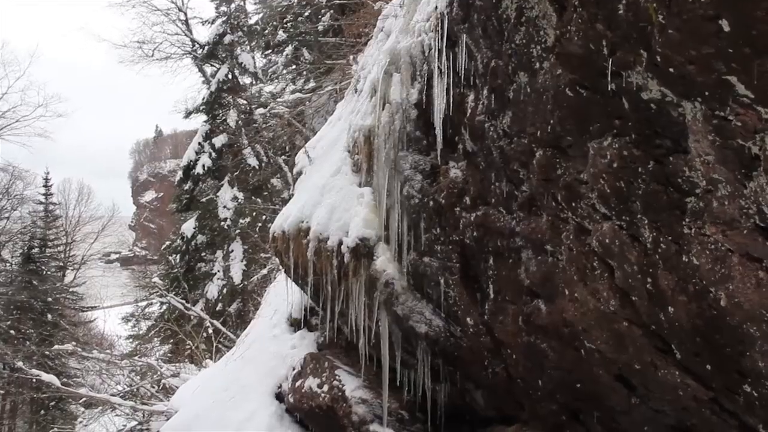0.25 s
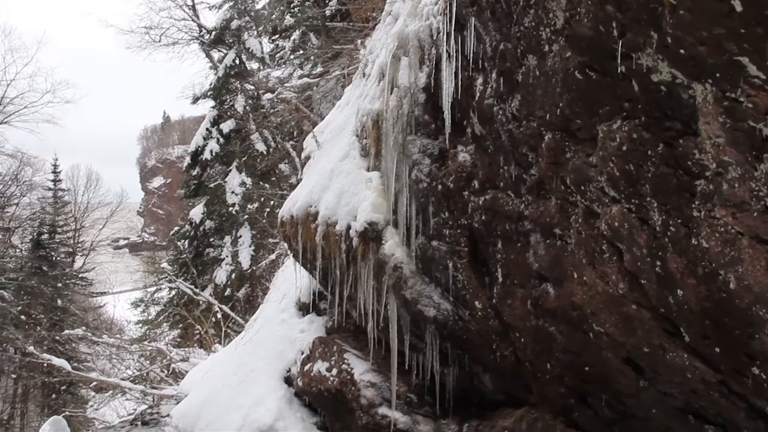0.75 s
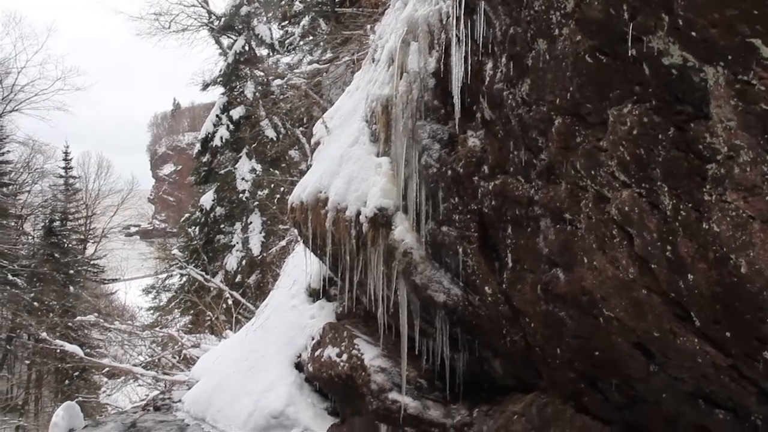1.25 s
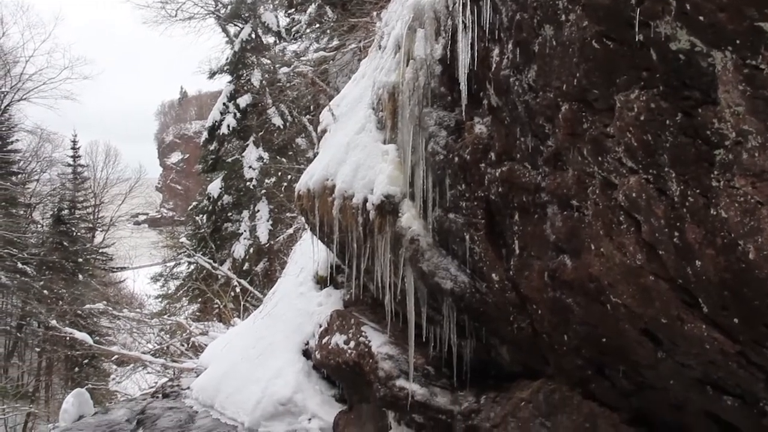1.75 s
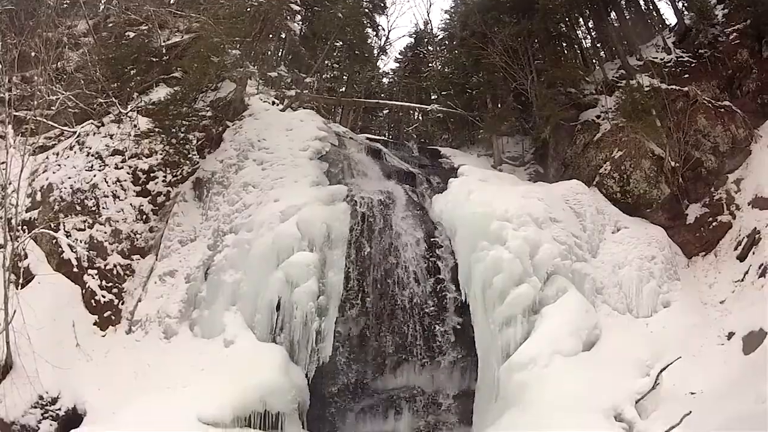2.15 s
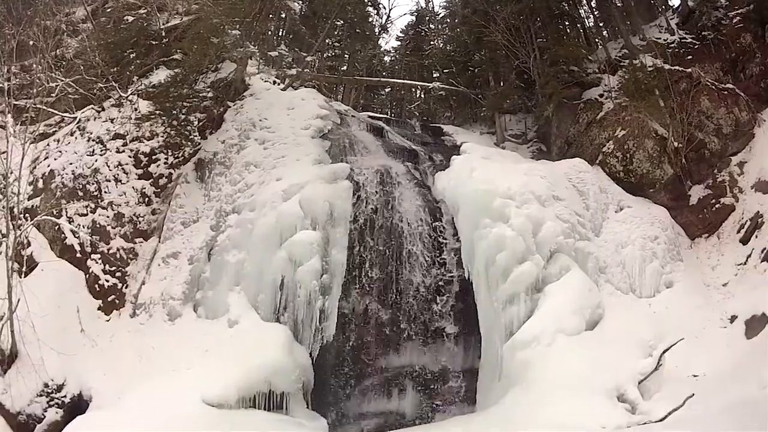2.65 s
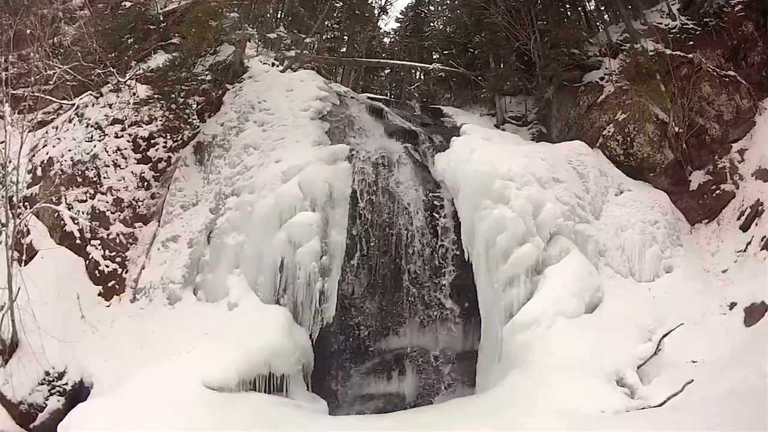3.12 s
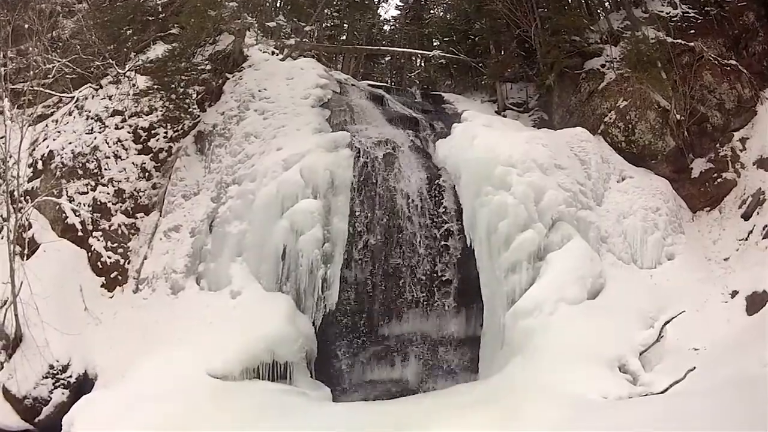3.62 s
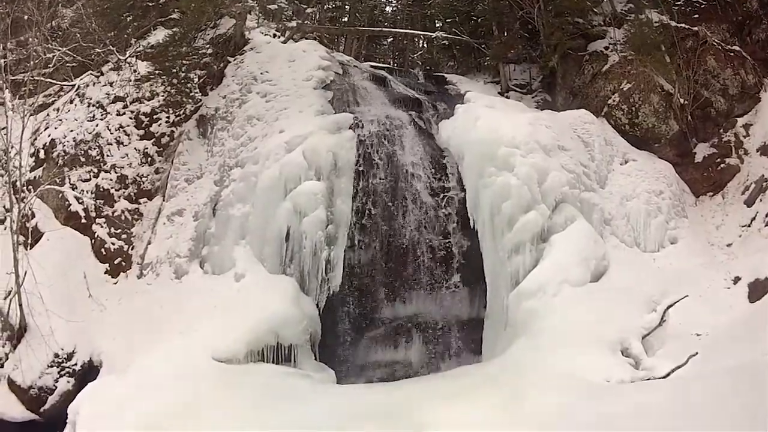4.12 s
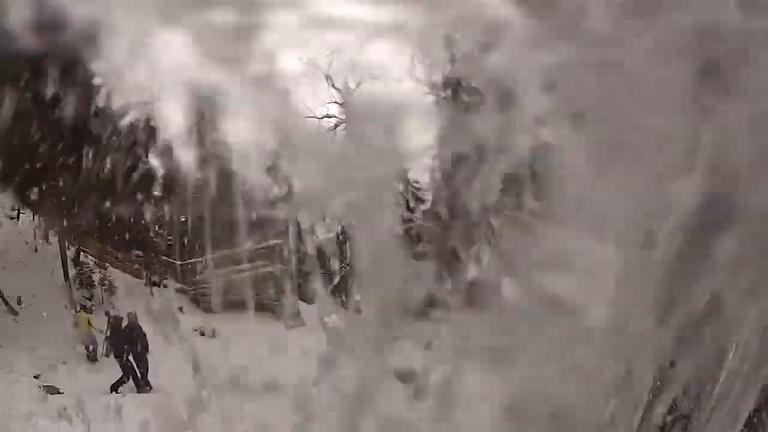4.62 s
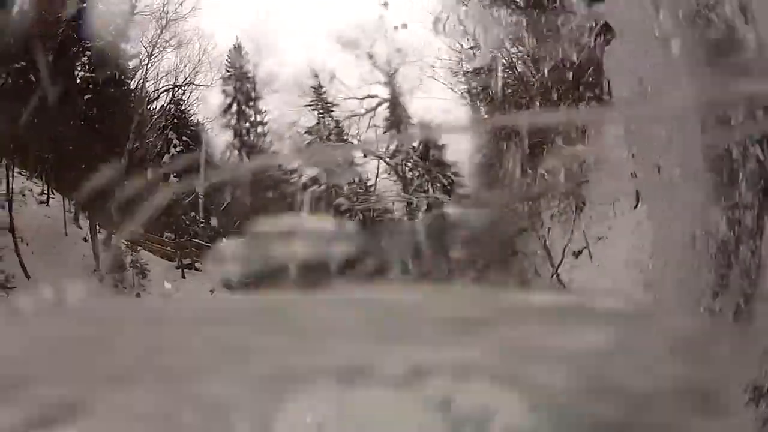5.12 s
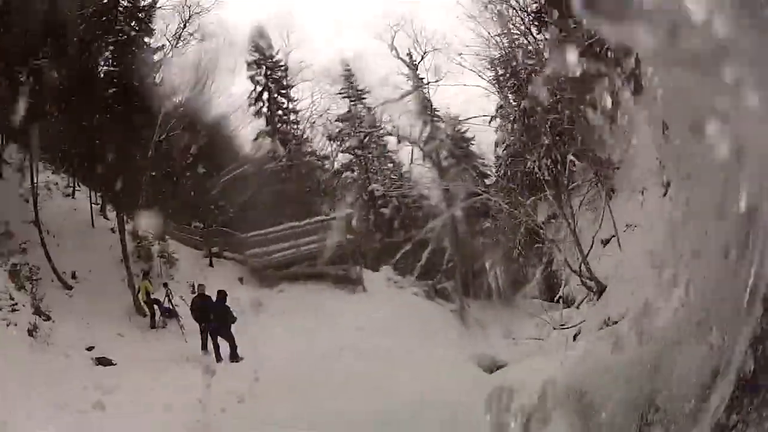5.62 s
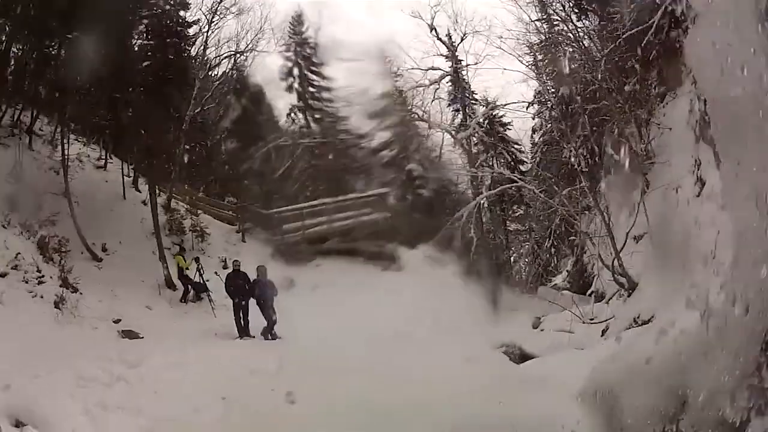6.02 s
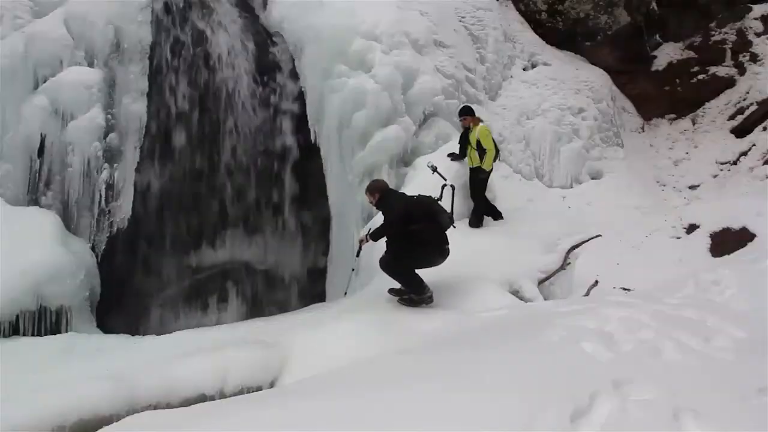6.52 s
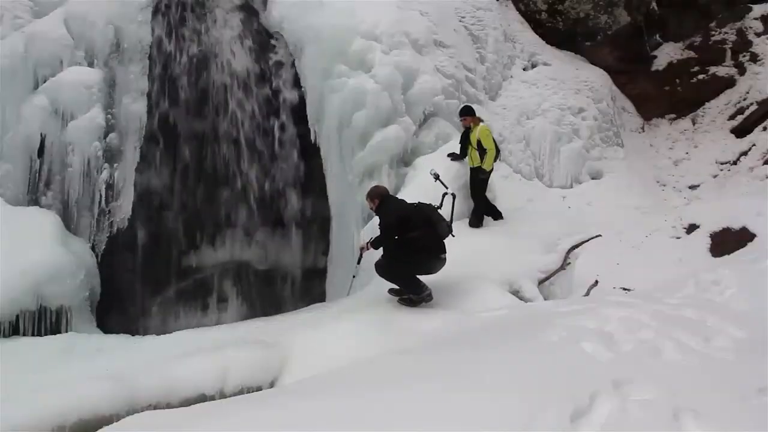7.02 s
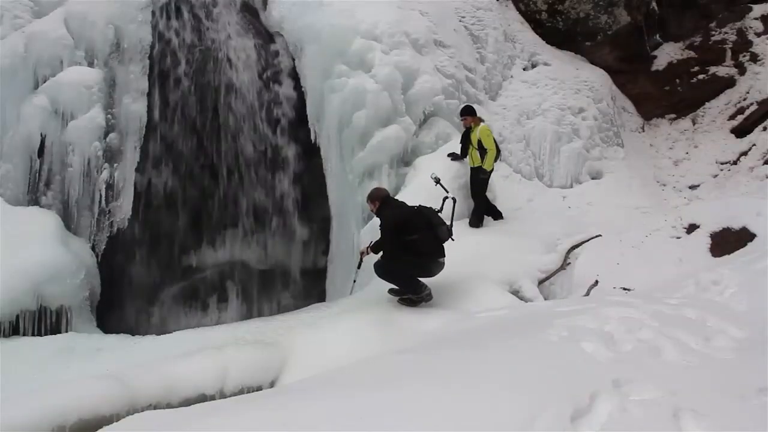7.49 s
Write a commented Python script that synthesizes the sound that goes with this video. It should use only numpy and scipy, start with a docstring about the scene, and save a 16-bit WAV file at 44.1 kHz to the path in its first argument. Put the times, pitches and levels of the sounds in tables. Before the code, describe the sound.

Half-frozen waterfall: rumbling roar under rock, near silence in a sealed case, violent distorted drop hits with hollow thumps, finally loud steady rushing water.

```python
"""A half-frozen waterfall from four places

The fall roars under a rock overhang, is muffled in a sealed camera housing, then heard in the spray, where
drops slap the housing and overdrive its microphone, and lastly in the open as a bright rush.
Falling water is filtered noise with random impacts; drops are brief shaken bursts that excite
decaying wall modes and an air hum. The sound is mono and changes abruptly on leaving the overhang
and on entering the open."""
import sys
import numpy as np
from scipy import signal
from scipy.fft import rfft, irfft, next_fast_len
from scipy.io import wavfile
from scipy.ndimage import uniform_filter1d, map_coordinates

SR = 44100
rng = np.random.default_rng(int(sys.argv[2]) if len(sys.argv) > 2 else 0)


def to_wav(s):
    """Save 16-bit WAV."""
    ch = np.atleast_2d(s).T  # columns
    pcm = np.round(np.clip(ch, -1, 1) * 32767)  # PCM
    wavfile.write(sys.argv[1], SR, pcm.astype(np.int16))


N = 341772

LEAVE_OVERHANG_S, ENTER_OPEN_S = 1.9975, 6.2345  # changes of place
ENTER_SPRAY_S, WETTING_S = 4.42, 0.28  # the camera enters the spray; time until water covers it
TOP_HZ = 15900  # band limit of the camera

# Roar under the overhang, spectral density: (frequency [Hz], level [dB per Hz])
ROAR_SPECTRUM = [(25, -29), (50, -24), (85, 0), (130, -13.5), (180, -2), (270, 2.5), (400, -6), (520, -4),
                 (680, -3), (1100, -4.5), (3400, -13), (7000, -19), (11800, -22), (15800, -33.5)]
# Water spattering on stone, spectral density: (frequency [Hz], level [dB per Hz])
SPATTER_SPECTRUM = [(200, -32), (2000, -11), (5000, -2), (9000, 3), (12000, -3.5), (15800, -15)]
# Broad spectrum of the fall heard inside the housing: (frequency [Hz], level [dB per Hz])
SEALED_SPECTRUM = [(25, -1), (60, -1.5), (130, -9), (290, -7.5), (600, -15.5), (1000, -14), (1200, -9),
                   (1550, -12), (1900, -7), (2200, 1), (2550, -3), (2850, -20), (3050, -30), (3600, -60)]
# Wall resonances that let the hiss in: (centre [Hz], width [Hz], level [dB])
WALL_RESONANCES = [(3300, 360, 1.5), (3840, 400, -17.5), (4770, 930, -6), (7190, 1040, -10),
                   (8660, 390, -6.5), (9740, 500, -12), (14200, 500, -15), (15150, 250, -11)]
# Hollow swell as the water closes in, before its final fade: (time [s], level [dB])
SWELL_LEVEL = [(4.05, -68), (4.264, -53.5), (4.318, -38), (4.386, -39.5), (4.4, -38.5)]
# Spectral density of that swell: (frequency [Hz], level [dB per Hz])
SWELL_SPECTRUM = [(8, -30), (25, -7), (65, 5.5), (150, -9), (300, -14), (450, -33), (800, -22), (1000, -15),
                  (1250, -5.5), (1500, -23), (2300, -16), (3500, -42), (12000, -35)]
# Fine spray on the housing, before the wall colours it: (frequency [Hz], level [dB per Hz])
SPRAY_SPECTRUM = [(8, -20), (25, 5), (90, -9), (300, -10), (430, -13), (650, -5.5), (900, -4), (1150, -4),
                  (1550, -6), (2200, -3), (3500, -12.5), (6000, -22), (10000, -25), (15500, -26)]
# Drops that slap the housing, levels relative before overdrive:
# (time [s], level [dB], length [s], mean pitch [Hz], level of the air hum [dB])
DROPS = [(4.422, -28, 0.009, 1126, -57), (4.468, -21.5, .0027, 2020, -54), (4.491, -16, .0015, 2050, -48),
         (4.501, -9.5, 0.0013, 1810, -44), (4.5161, -4, .0012, 1340, -35), (4.5215, 0, 0.0051, 1195, -32),
         (4.5947, -20, 0.0035, 970, -22), (4.6025, -5.5, 0.0042, 897, -38), (4.619, -27, 0.0073, 900, -50),
         (4.6596, -9, 0.0045, 1576, -44), (4.676, -13.5, .004, 1200, -20), (4.685, -20.5, .007, 890, -30),
         (4.7026, -31, 0.0069, 905, -25), (4.7495, -4, .0037, 925, -18.5), (4.763, -21.5, .0025, 2070, -51),
         (4.833, -25, 0.0023, 1370, -58), (4.8492, -26.5, 0.0043, 950, -43),
         (4.871, -32.5, 0.007, 814, -29), (4.9314, -5.5, 0.0021, 1430, -34), (4.956, -16, 0.0095, 718, -40),
         (4.979, -20.5, .0045, 980, -18.5), (5.0255, -8, .0014, 980, -30), (5.058, -5, 0.0014, 1430, -24),
         (5.1043, -13, .007, 1100, -30), (5.1186, -8, 0.0028, 950, -40), (5.159, -8, 0.0049, 875, -27),
         (5.1873, -6, 0.0049, 1180, -15.5), (5.197, -19, 0.0055, 980, -46), (5.2089, -2, 0.0036, 1596, -34),
         (5.245, -22.5, .004, 1820, -38), (5.289, -20, 0.0064, 1490, -19), (5.2957, -20, 0.0073, 1010, -28),
         (5.3048, -18, 0.01, 860, -21), (5.3116, -11, 0.0043, 1297, -37), (5.4268, -31.5, .008, 1260, -48),
         (5.448, -13.5, 0.0019, 1300, -44), (5.4737, -7.5, .002, 920, -39),
         (5.5073, -16, 0.0049, 630, -23.5), (5.526, -21, .0025, 1500, -51),
         (5.5526, -15.5, 0.0029, 1790, -33), (5.5688, -6.5, 0.0015, 1120, -27),
         (5.61, -9.5, 0.0012, 1950, -35), (5.6358, -16, .002, 1410, -21), (5.647, -3, 0.0068, 1326, -26),
         (5.6883, -10.5, 0.0021, 1500, -20), (5.6948, -12.5, 0.0032, 1430, -35),
         (5.705, -28, 0.0043, 710, -15), (5.7546, -4.5, .0044, 2064, -30),
         (5.8189, -9.5, 0.0022, 1420, -24.5), (5.8658, -17, 0.0015, 930, -39),
         (5.8735, -17, .0016, 900, -47), (5.886, -14, 0.0056, 1570, -12.5), (5.8964, -12, .005, 914, -34),
         (5.9066, -15, .007, 925, -15), (5.9158, -14.5, 0.0076, 624, -45), (5.95, -10.5, 0.0018, 816, -44),
         (5.955, -13, .002, 820, -44), (5.9785, -26, 0.006, 895, -25), (5.991, -3, 0.0035, 860, -17),
         (6.0486, -26.5, 0.0041, 900, -53), (6.106, -34.5, 0.0062, 910, -40),
         (6.1477, -21.5, 0.007, 1990, -27.5), (6.1548, -22, 0.011, 796, -20.5),
         (6.2198, -4, 0.005, 1514, -45), (6.2296, 0.5, .0043, 863, -32)]
# Modes with which the housing wall rings: (nominal frequency [Hz], relative level [dB], t60 [s])
HOUSING_MODES = [(590, -10, .04), (840, -5, .07), (945, -1, .1), (7130, -25, .05), (8900, -26, .05)]
# Transmission of the housing wall, with deep notches: (frequency [Hz], gain [dB])
WALL_GAIN = [(200, 5), (430, -4.5), (600, 1.5), (860, 2), (1200, -4), (1500, -0.5), (3400, -1.5),
             (3850, -9), (4120, -13.5), (4550, 5.5), (7200, 8), (7700, -15), (8400, -10), (8850, 7.5),
             (11300, 8), (12000, -11), (12600, 7.5), (15200, 6), (15600, -15)]
# Whole gushes of water that dent the housing: (time [s], relative level [dB])
GUSHES = [(4.429, -17), (4.5174, 12), (5.2087, -11.5), (6.2297, 0)]
# Rush in the open, spectral density: (frequency [Hz], level [dB per Hz])
RUSH_SPECTRUM = [(30, -32), (80, -25.5), (150, -10), (300, -6.5), (600, -3.5), (1300, -2), (2500, -1.5),
                 (4200, 0), (7000, -1), (9700, -1), (12500, -6), (15700, -12)]


def amp(db):
    """Logarithmic level: 20 dB is a factor of ten in amplitude."""
    return 10 ** (np.asarray(db) / 20)


def unit(x):
    """Normalization: scale a signal to rms 1."""
    return x / np.sqrt(np.mean(x ** 2) + 1e-20)


def shape(points, hz):
    """Spectral envelope: interpolate (frequency [Hz], level [dB]) points over log frequency."""
    f, db = np.transpose(points)
    return amp(np.interp(np.log(hz + 1), np.log(f + 1), db))


def level(rows):
    """Amplitude envelope: interpolate (time [s], level [dB]) rows to a gain per sample."""
    return amp(np.interp(np.arange(N) / SR, *np.transpose(rows)))


def wobble(rate):
    """Slow random modulation: a smooth curve through `rate` random knots per second."""
    knots = rng.standard_normal(int(N * rate / SR) + 4)
    return map_coordinates(knots, [np.arange(N) * rate / SR])


def coloured(x, gain):
    """Minimum-phase filtering: the folded cepstrum gives a causal filter with the given gain."""
    m = 2 * next_fast_len(N // 2 + SR // 4)
    log_gain = np.log(np.maximum(gain(np.fft.rfftfreq(m, 1 / SR)), 1e-6))
    cepstrum = irfft(log_gain)
    cepstrum[1:m // 2] *= 2
    cepstrum[m // 2 + 1:] = 0
    response = np.exp(rfft(cepstrum))
    return irfft(rfft(x, m) * response)[:N]


def patter(rate, spread_db):
    """Shot noise: random tiny impacts of unequal size, about `rate` per second, rms 1."""
    chance, size = rng.random(N), rng.standard_normal(N)
    sign = np.sign(rng.standard_normal(N))
    impacts = (chance < rate / SR) * sign * amp(spread_db * np.clip(size, -2, 2))
    return unit(impacts)


def water(patchy_db, rate, splash_db):
    """Superposition: countless bubbles add up to noise in shifting patches, with nearer splashes on top."""
    spectrogram = signal.stft(rng.standard_normal(N), nperseg=512)[2]
    field = uniform_filter1d(rng.standard_normal(spectrogram.shape), size=5, axis=0)  # over frequency
    field = uniform_filter1d(field, size=8, axis=1)  # over time
    churn = signal.istft(spectrogram * amp(patchy_db * unit(field)), nperseg=512)[1][:N]
    splashes = patter(rate, spread_db=4.5)
    return unit(unit(churn) + amp(splash_db) * splashes)


def overhang(roar_db=-18.2, spatter_db=-35):
    """Reflection: the rock roof gathers the low roar; nearby, water spatters on stone in quick flurries."""
    flow = water(patchy_db=1.45, rate=980, splash_db=-8.0) * amp(0.24 * wobble(30.56))
    roar = unit(coloured(flow, lambda hz: shape(ROAR_SPECTRUM, hz)))
    flurries = patter(rate=1400, spread_db=6.5) * amp(2.5 * wobble(44.8))
    spatter = unit(coloured(flurries, lambda hz: shape(SPATTER_SPECTRUM, hz)))
    return amp(roar_db) * roar + amp(spatter_db) * spatter


def sealed_gain(hz):
    """Resonant transmission: wall resonances add to the broad gain of the sealed housing."""
    gain = shape(SEALED_SPECTRUM, hz)
    for centre, width, db in WALL_RESONANCES:
        gain = gain + amp(db) / (1 + ((hz - centre) / width) ** 2) ** 2
    return gain


def sealed_fall(hiss_db=-49, covered_db=-63, swell_fade_db_per_s=300):
    """Transmission: resonances pass the hiss, which swells hollowly, then dims as water covers the wall."""
    flow = water(patchy_db=1.5, rate=1500, splash_db=-18)
    cover = level([(ENTER_SPRAY_S, hiss_db), (ENTER_SPRAY_S + WETTING_S, covered_db)])
    hiss = cover * unit(coloured(flow, sealed_gain))
    gurgle = water(patchy_db=0.5, rate=260, splash_db=-7)
    time_in_spray = np.maximum(np.arange(N) / SR - ENTER_SPRAY_S, 0)
    swell_level = level(SWELL_LEVEL) * amp(-swell_fade_db_per_s * time_in_spray)
    swell = swell_level * unit(coloured(gurgle, lambda hz: shape(SWELL_SPECTRUM, hz)))
    return hiss + swell


def spray(mist_db=-52, approach_db_per_s=130, cloud_db=-35, cloud_grows=0.28, trail_s=0.019):
    """Addition of powers: fine droplets prickle as a mist that rises to a steady level, plus a decaying
    cloud after every listed drop."""
    t = np.arange(N) / SR
    power = amp(mist_db - approach_db_per_s * np.maximum(ENTER_SPRAY_S - t, 0)) ** 2
    for start, db, *_ in DROPS:
        decay = np.exp(-np.clip((t - start) / trail_s, 0, 20))  # trail_s is the time constant of power
        power = power + (t > start) * amp(cloud_db + cloud_grows * db) ** 2 * decay
    fine = water(patchy_db=1.0, rate=170, splash_db=2.5)
    return np.sqrt(power) * unit(coloured(fine, lambda hz: shape(SPRAY_SPECTRUM, hz)))


def droplets(count=24, mean_db=-33, spread_db=3, lag_s=0.017, length_s=0.0053,
             pitch_hz=1050, pitch_spread=0.3, hum_db=-42):
    """Random succession: small drops follow some of the big ones; same columns as DROPS."""
    leaders = rng.permutation([row[0] for row in DROPS])[:count]
    rows = []
    for start, (late, size, tone) in zip(leaders, rng.standard_normal((count, 3))):
        time = start + lag_s * np.exp(0.35 * late)
        pitch = pitch_hz * np.exp(pitch_spread * tone)
        rows.append((time, mean_db + spread_db * size, length_s, pitch, hum_db))
    return rows


def slaps(drops, wander=0.29, fade_s=0.003, rise_s=0.00012, hiss_db=-11, splash_db=-27, splash_t60_s=0.063,
          crack_db=-1.0, crack_db_per_octave=3.0, crack_hz=1300, ring_db=-23, ring_grows=0.42):
    """Impact excitation: each drop shakes the wall for milliseconds, splashes and leaves its modes ringing;
    higher drops crack more, harder ones ring more."""
    out, t = np.zeros(N + SR), np.arange(SR // 4) / SR
    crack_band = signal.butter(2, [1300, 3000], "band", fs=SR, output="sos")
    for start, db, length, hz, _ in drops:
        drift, grit, hiss = rng.standard_normal((3, len(t)))
        drift = unit(uniform_filter1d(drift, size=16))  # the flattening drop keeps changing the load on the wall
        shake = np.sqrt(2) * np.sin(2 * np.pi * np.cumsum(hz * (1 + wander * drift)) / SR)
        crack = unit(signal.sosfilt(crack_band, grit)) + amp(hiss_db) * hiss
        sharpness = amp(crack_db + crack_db_per_octave * np.log2(hz / crack_hz))
        blow = (shake + sharpness * crack) / np.hypot(1, sharpness)
        # the press starts sharply and sinks by 6.6 dB over the drop's length
        press = (1 - np.exp(-t / rise_s)) * amp(3 - 6.6 * np.minimum(t / length, 1))
        release = np.exp(-2 * np.maximum(t - 1.144 * length, 0) / fade_s)
        splash = amp(splash_db - 60 * t / splash_t60_s) * crack
        ring = 0
        for mode_hz, mode_db, t60 in HOUSING_MODES:
            film = 1 + 0.025 * rng.standard_normal()  # the water film detunes the wall a little
            decay = amp(mode_db + 2 * rng.standard_normal() - 60 * t / t60)
            ring = ring + decay * np.sin(2 * np.pi * mode_hz * film * t)
        slap = amp(db) * (press * release * blow + splash)
        out[round(start * SR):][:len(t)] += slap + amp(ring_db + ring_grows * db) * ring
    return out[:N]


def cavity(drops, push_s=0.0029, cavity_hz=200, cavity_t60_s=0.14, sag=0.037, drain_s=0.024,
           dent_db=-19, dent_grows=0.8, dent_length_s=0.0031):
    """Elastic recoil and cavity resonance: water dents the wall, which springs back; the air inside
    thumps and hums. Harder and longer drops dent it more."""
    out, t = np.zeros(N + SR), np.arange(SR // 4) / SR
    u = t / push_s
    push = -u * (2 - u) * np.exp(1 - u)  # inward, then outward after 2 * push_s
    for start, db, length, _, hum_db in drops:
        film = 1 + 0.03 * rng.standard_normal()  # small random detuning of each hum
        hz = cavity_hz * film * (1 - sag * np.exp(-t / drain_s))  # the pitch recovers as the water runs off
        hum = amp(hum_db - 60 * t / cavity_t60_s) * np.sin(2 * np.pi * np.cumsum(hz) / SR)
        dent = amp(dent_db + dent_grows * db) * np.sqrt(length / dent_length_s)
        out[round(start * SR):][:len(t)] += dent * push + hum
    for start, db in GUSHES:
        out[round(start * SR):][:len(t)] += amp(db) * push
    return out[:N]


def housing(drive_db=1.5):
    """Saturation: drops overdrive the microphone into square-edged cracks, coloured by the wall."""
    drops = DROPS + droplets()
    squared = np.tanh(amp(drive_db) * (slaps(drops) + spray()))
    cracks = coloured(squared, lambda hz: shape(WALL_GAIN, hz))
    return cracks + cavity(drops) + sealed_fall()


def open_fall(rush_db=-16.5, surge_db=0.3):
    """Broadband radiation: sheets of water shatter on the rock close by, surging a little."""
    surge = amp(0.1 * wobble(15) + surge_db * wobble(7))
    flow = water(patchy_db=1.5, rate=2500, splash_db=-6.0) * surge
    return amp(rush_db) * unit(coloured(flow, lambda hz: shape(RUSH_SPECTRUM, hz)))


def scene():
    """Diotic presentation: one place after another, alike in both ears."""
    t = np.arange(N) / SR
    mono = np.select([t < LEAVE_OVERHANG_S, t < ENTER_OPEN_S], [overhang(), housing()], open_fall())
    return np.array([mono, mono])


def record(dry):
    """Clipping and band limitation: the camera clips at full scale, then keeps nothing above TOP_HZ."""
    m = next_fast_len(N + SR // 2)
    passband = np.fft.rfftfreq(m, 1 / SR) < TOP_HZ
    return irfft(rfft(np.clip(dry, -1, 1), m) * passband, m)[:, :N]


dry = scene()
out = record(dry)
to_wav(out)
```